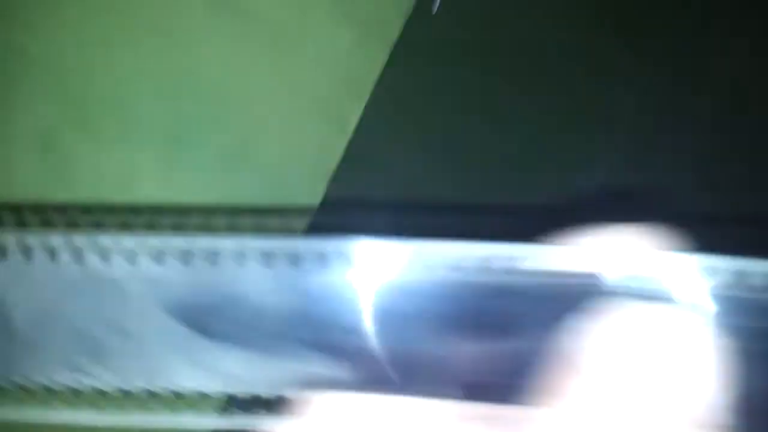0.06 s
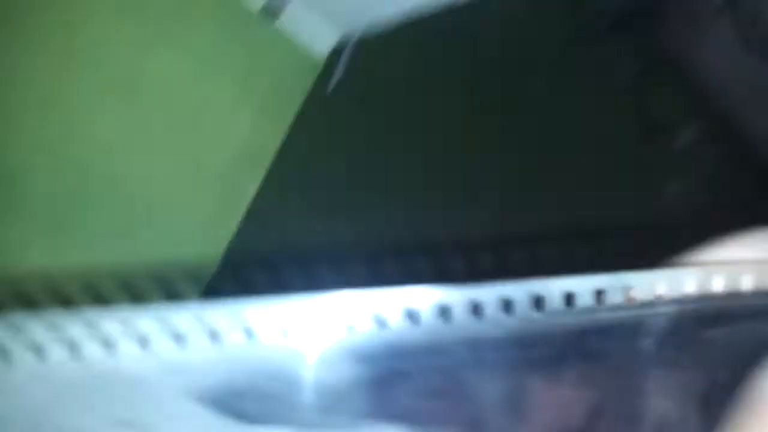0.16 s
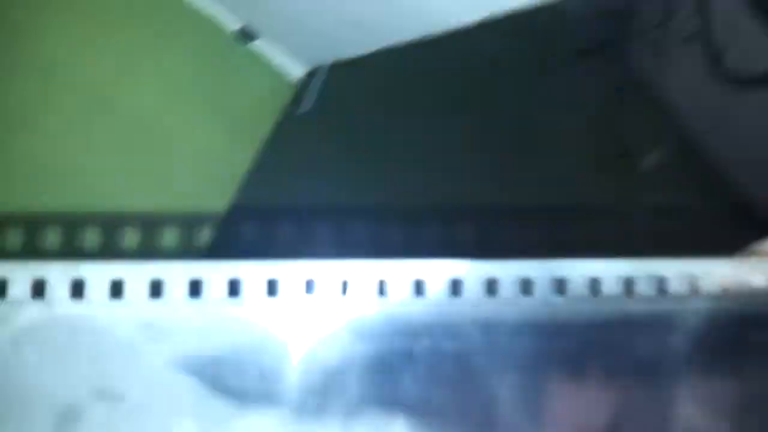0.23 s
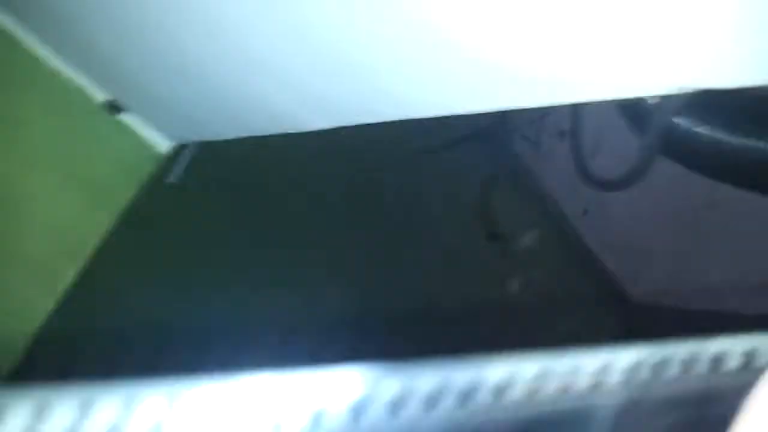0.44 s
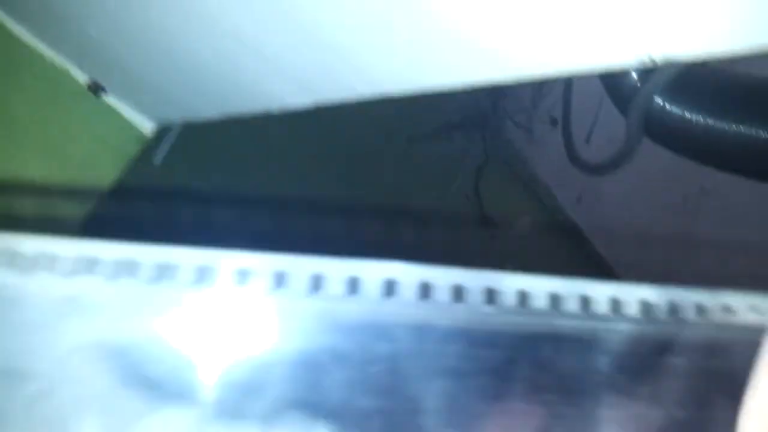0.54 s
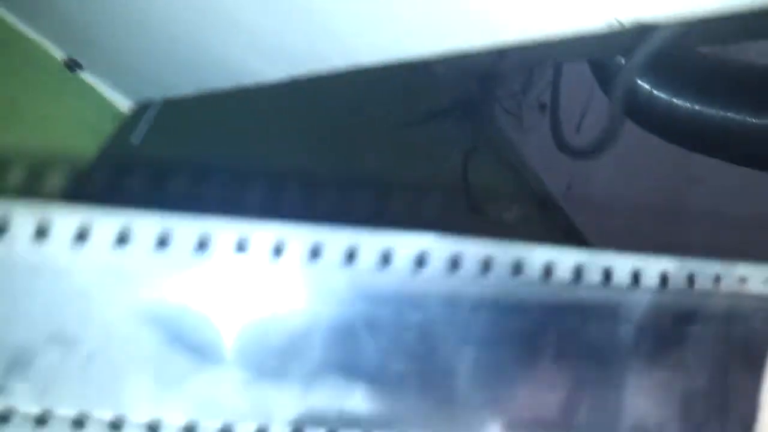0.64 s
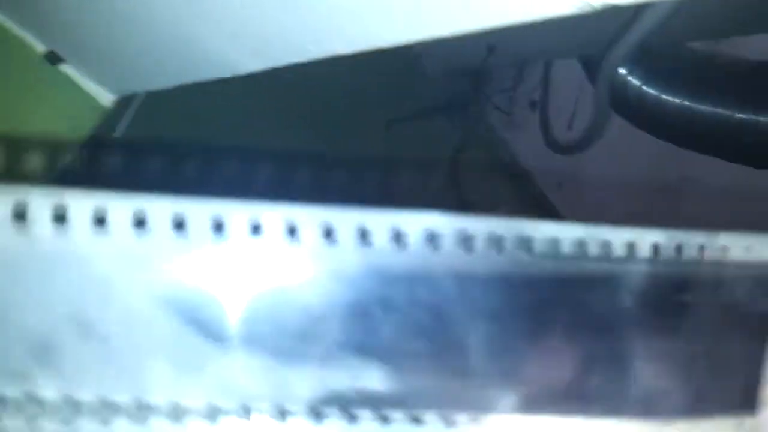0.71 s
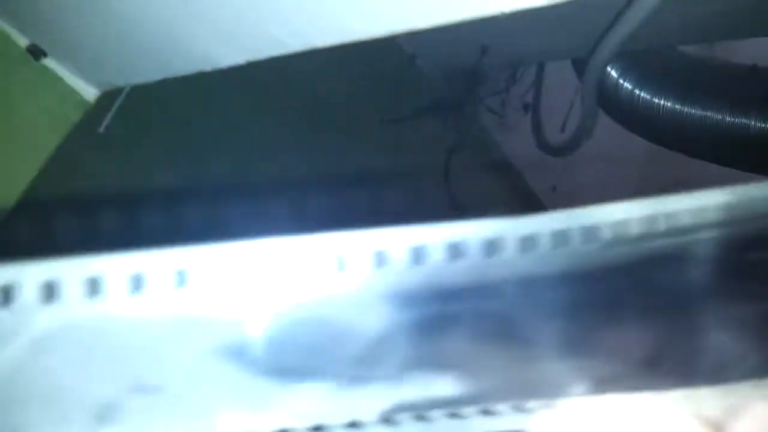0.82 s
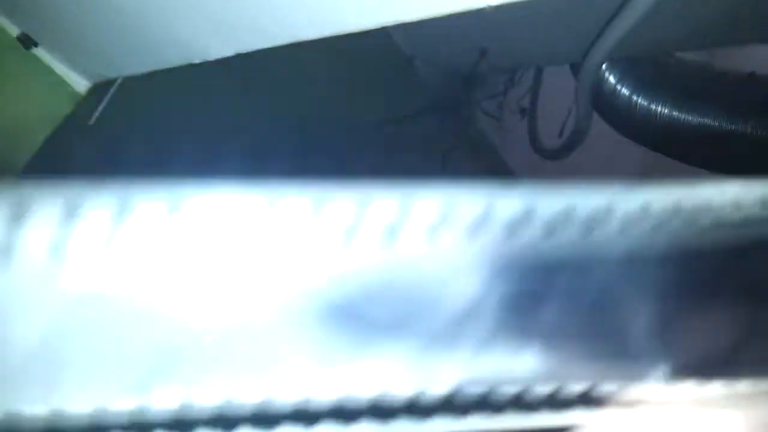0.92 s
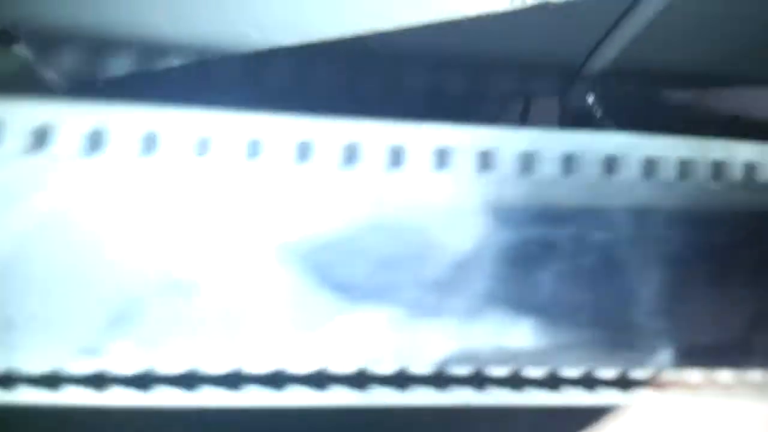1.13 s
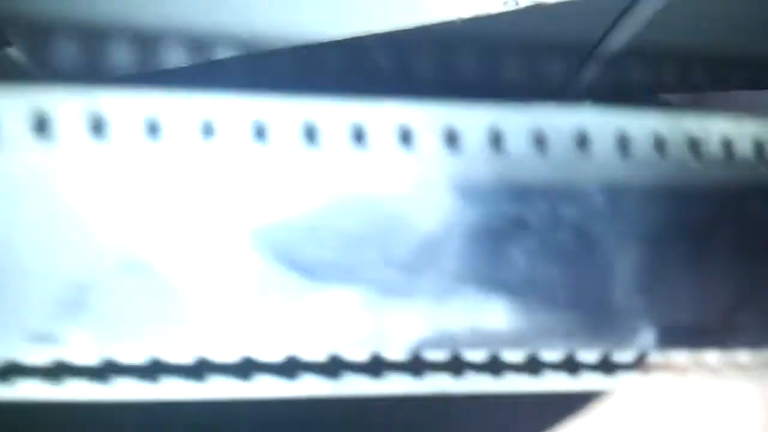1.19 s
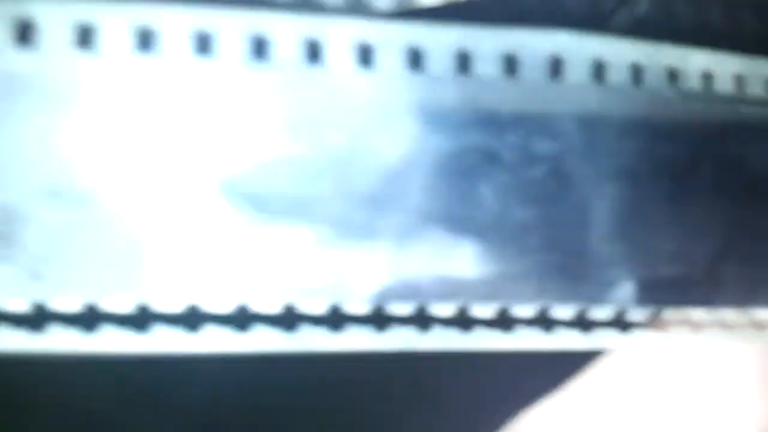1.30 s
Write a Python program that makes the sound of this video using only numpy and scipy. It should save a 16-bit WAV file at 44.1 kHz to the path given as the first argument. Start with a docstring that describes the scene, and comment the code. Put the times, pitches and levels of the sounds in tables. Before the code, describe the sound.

Close to the microphone, stiff film slides hissing between fingers and buckles in quick, irregular clicks, loudest just past the middle. Faint hand shuffling and soft bumps lie underneath, with a short room echo and quiet steady hiss.

```python
"""Film strip through the fingers

Close to a camera's microphone, in a hard-walled room, a strip of photographic film is pulled by hand.
The stiff strip hisses as it slides and buckles with sharp snaps; some snaps jolt the camera.
Behind it the room rings on for about a second over a quiet, steady hiss."""
import sys
import numpy as np
from scipy import signal
from scipy.fft import rfft, irfft, next_fast_len
from scipy.io import wavfile

SR = 44100
rng = np.random.default_rng(int(sys.argv[2]) if len(sys.argv) > 2 else 0)


def to_wav(sig):
    """Store sig (one row per channel, or 1-D mono) as 16-bit WAV at the path in sys.argv[1].

    Samples outside -1..1 are clipped; the rate is SR.
    """
    pcm = np.clip(np.atleast_2d(sig), -1, 1) * 32767
    pcm = np.round(pcm).astype(np.int16)
    wavfile.write(sys.argv[1], SR, pcm.T)  # frames by channels


N = 59535

# Colours of the steady hiss and of the room's lingering wash: (frequency [Hz], relative level [dB])
HISS_COLOUR = [(25, -6.5), (250, -3), (700, -7), (1100, -6), (1700, -16.5), (4200, -11), (5500, -6),
               (9000, -36), (15500, -18)]
WASH_COLOUR = [(100, -26), (400, -10), (900, -8.5), (1800, -2.5), (3000, -1), (5000, 1), (8000, -5.5),
               (15000, -36)]
# Film sliding between the fingers, close up: (time [s], level [dB])
SLIDE_LEVEL = [(0, -55.5), (.105, -48.5), (.165, -42.5), (.21, -45.5), (.25, -37), (.295, -45.5),
               (.35, -51.5), (.395, -42.5), (.478, -44.5), (.492, -54.5), (.555, -49), (.6, -44),
               (.655, -55), (.69, -57), (.71, -43.5), (.735, -52), (.76, -35.5), (.83, -44.5), (.9, -65),
               (.945, -38), (.98, -74), (1.02, -48.5), (1.07, -51.5), (1.11, -62.5), (1.35, -69)]
# Colours of skin rubbing on film and of the fizz above it: (frequency [Hz], relative level [dB])
RUB_COLOUR = [(200, -50), (1000, -24.5), (2500, -22.5), (4000, -14), (5200, -9.5), (6000, 0.5),
              (7000, -1.5), (8500, -7.5), (12000, -14), (15500, -18.5)]
FIZZ_COLOUR = [(3000, -31), (6000, -18), (12300, -9), (15500, -15)]
# Bright swish of the film's edge: (time [s], level [dB], t60 [s])
EDGE_FLICKS = [(.702, -39.5, 0.17)]
# Hands moving near the microphone: (time [s], level [dB])
SHUFFLE_LEVEL = [(0, -65.5), (.22, -57.5), (.4, -62.5), (.66, -66), (.715, -59), (.78, -56), (.9, -61),
                 (.95, -54.5), (1.02, -68), (1.35, -76)]
# Jolts that reach the camera body: (time [s], level [dB])
CAMERA_JOLTS = [(0.119, -53.5), (0.525, -53), (0.766, -50)]
# Colours of the shuffle and of a jolt's thud: (frequency [Hz], relative level [dB])
SHUFFLE_COLOUR = [(40, -6.5), (150, -4.5), (300, 4), (750, -2), (1300, -7), (3000, -16)]
THUD_COLOUR = [(10, 11), (30, -15), (70, -3.5), (150, -24), (500, -41)]
# The strip buckles, mostly in quick bright snaps, once in a slow low flex: (time [s], ring level [dB],
# ring pitch [Hz], swell to peak [s], crack level [dB], crack tilt [dB/octave], flap level [dB])
BUCKLES = [(0.117, -20, 7430, 0.00034, -39, 4, -43), (0.1194, -19, 6030, 0.00061, -26.5, 0, -41),
           (0.1221, -25.5, 5540, 0.00066, -29, 3, -35), (0.1794, -33, 2800, 0.00047, -36, -6, -41),
           (0.1818, -22, 2980, .0008, -47, -6, -35), (0.1847, -35.5, 1300, 0.0004, -52, -4, -34),
           (0.2281, -31.5, 5600, 0.00096, -32, -1, -39), (0.5256, -20, 6970, 0.00033, -24.5, 2.5, -46.5),
           (0.544, -32, 5700, 0.00023, -32.5, 0.5, -50), (.6238, -41, 4020, 0.00034, -43, -1, -64),
           (0.6319, -40, 5670, 0.00036, -56, -3, -45), (0.6896, -29.5, 13800, 0.00033, -31.5, 3, -43),
           (.7480, -44.5, 740, 0.0041, -40, -11, -41), (0.7495, -22, 8640, 0.00022, -23, 3, -47),
           (0.7511, -19.5, 5590, 0.00087, -20, -20, -34.5), (0.766, -11.5, 6830, 0.00032, -22.5, 3, -26.5),
           (.8108, -18.5, 7120, 0.00051, -21.5, 0.5, -50), (.8546, -22.5, 6550, 0.00026, -24.5, -3, -62),
           (.8615, -25, 3640, 0.00038, -40, -9, -32.5), (0.87, -25, 7530, 0.0003, -34, 7, -60),
           (0.9324, -29, 6500, 0.00039, -32.5, -13.5, -41.5),
           (0.9524, -32.5, 6170, 0.0013, -29.5, -0.5, -39), (.96, -33, 5830, 0.00034, -31.5, -3.5, -50),
           (1.155, -35, 6760, 0.00043, -53, -3, -61), (1.1586, -29.5, 5920, 0.00044, -41.5, -1, -49)]
# Bending modes of the curled strip: (frequency [Hz], level relative to the flap [dB], t60 [s])
BENDING_MODES = [(720, -21, 0.016), (931, -21.5, 0.045), (1150, -19, 0.029), (1450, -16.5, 0.016)]
# Colours of a snap's bright crack and dull flap: (frequency [Hz], relative level [dB])
CRACK_COLOUR = [(1000, -38), (3000, -19), (4200, 4.5), (7000, 7), (12000, 2), (15500, -12.5)]
FLAP_COLOUR = [(60, -4), (250, -20), (700, -5.5), (1500, -2.5), (3000, 4.5), (5000, 3.5), (9000, -18)]
# Decay between the hard walls: (frequency [Hz], t60 [s])
ROOM_DECAY = [(200, 1.6), (1000, 0.82), (4000, 0.55), (5800, 0.67), (15000, 0.58)]
# Tone of the room's tail at the microphone: (frequency [Hz], gain [dB])
ROOM_COLOUR = [(200, -2.5), (1000, 5), (4200, 0.5), (6000, 1), (9000, -4), (15000, -7)]

SNAP_S = 0.08  # time allowed for one snap to die away


def amp(db):
    """Decibels to gain."""
    return 10 ** (np.asarray(db) / 20)


def unit(x):
    """Scale to rms 1."""
    return x / np.sqrt(np.mean(x ** 2) + 1e-20)


def along(points, hz):
    """(Hz, value) points read on a log axis."""
    f, v = np.transpose(points)
    return np.interp(np.log(hz + 1), np.log(f + 1), v)


def level(rows):
    """(s, dB) points as a gain per sample."""
    return amp(np.interp(np.arange(N) / SR, *np.transpose(rows)))


def filtered(x, response):
    """x through a gain that depends on frequency."""
    n = x.shape[-1]
    padded = next_fast_len(n + n // 5)
    return irfft(rfft(x, padded) * response(np.fft.rfftfreq(padded, 1 / SR)), padded)[..., :n]


def coloured(x, spectrum):
    """x with a (Hz, dB) colour, at rms 1."""
    return unit(filtered(x, lambda hz: amp(along(spectrum, hz))))


def noise(spectrum):
    """Steady noise of a given colour."""
    return coloured(rng.standard_normal(N), spectrum)


def burst(source, s, t60, rise):
    """A quickly rising, dying piece of a noise, starting at s; its envelope sets its energy."""
    t = np.maximum(np.arange(len(source)) / SR - s, 0)
    shape = amp(-60 * t / t60) * (1 - np.exp(-t / rise))
    return unit(source * shape) * np.sqrt(np.mean(shape ** 2))


def even_burst(s, t60, rise):
    """A short white burst with its spectrum evened out, so that no pitch stands out."""
    t = np.arange(int(SNAP_S * SR)) / SR - s
    x = burst(rng.standard_normal(len(t)), s, t60, rise)
    size = x.std()
    for _ in range(4):
        flat_spectrum = np.exp(1j * np.angle(rfft(x)))
        x = irfft(flat_spectrum, len(t)) * (t > 0) * (t < t60)
    return size * unit(x)


def add(track, s, sound):
    """Mix a short sound into a track at time s."""
    part = track[round(s * SR):][:len(sound)]
    part += sound[:len(part)]


def background(hiss_db=-63.5, wash_db=-47, fall_db_per_s=30):
    """Steady hiss under the fading wash of a room that is still ringing at the start."""
    wash_gain = amp(wash_db - fall_db_per_s * np.arange(N) / SR)
    return amp(hiss_db) * noise(HISS_COLOUR) + wash_gain * noise(WASH_COLOUR)


def slide(slips_per_s=8300, spread_db=1, fizz_peak_db=-48):
    """Tiny slips of skin on film sound through the strip's resonance; speed or a flick adds fizz."""
    slips = (rng.random(N) < slips_per_s / SR) * rng.standard_normal(N)
    slips *= amp(-spread_db * rng.standard_normal(N))
    speed = level(SLIDE_LEVEL)
    fizz = noise(FIZZ_COLOUR)
    fizz_gain = amp(fizz_peak_db) * (speed / speed.max()) ** 1.34  # grows faster than the rub
    flicks = sum(amp(db) * burst(fizz, s, t60, rise=0.011) for s, db, t60 in EDGE_FLICKS)
    return speed * coloured(slips, RUB_COLOUR) + fizz_gain * fizz + flicks


def hands():
    """The hands shuffle softly by the microphone and pass low jolts into the camera body."""
    thud = noise(THUD_COLOUR)
    jolts = sum(amp(db) * burst(thud, s, t60=0.25, rise=0.0035) for s, db in CAMERA_JOLTS)
    return level(SHUFFLE_LEVEL) * noise(SHUFFLE_COLOUR) + jolts


def snaps(curl_spread=0.058):
    """Each buckle briefly rings the strip, with a crack and a dull flap that stirs its bending modes."""
    rings, knocks = np.zeros(N), np.zeros(N)
    t = np.arange(int(SNAP_S * SR)) / SR
    for s, ring_db, ring_hz, swell_s, crack_db, tilt, flap_db in BUCKLES:
        swell = (t / swell_s * np.exp(1 - t / swell_s)) ** 2
        add(rings, s, amp(ring_db) * swell * np.sin(2 * np.pi * ring_hz * t))
        detune = np.exp(curl_spread * rng.standard_normal())  # the curl changes from snap to snap
        bends = sum(amp(db + rng.normal(0, 1) - 60 * t / t60) * np.sin(2 * np.pi * hz * detune * t)
                    for hz, db, t60 in BENDING_MODES)
        crack = even_burst(0, t60=0.0076, rise=0.0001)
        flap = even_burst(0, t60=0.015, rise=0.000276)
        tilted = [(hz, db + tilt * np.log2(hz)) for hz, db in CRACK_COLOUR]
        add(knocks, s, amp(crack_db) * crack.std() * coloured(crack, tilted))
        add(knocks, s, amp(flap_db) * (flap.std() * coloured(flap, FLAP_COLOUR) + bends))
    return rings, knocks


def early_echoes(x, gap_s=0.0015):
    """Hands and close surfaces scatter each snap back to the microphone, by new paths every time."""
    scattered = np.zeros(N)
    cuts = sorted(row[0] for row in BUCKLES) + [N / SR]
    for start, end in zip(cuts, cuts[1:]):
        snap = x[round(start * SR):round(end * SR)]
        echoes = even_burst(gap_s, t60=0.022, rise=0.00041)
        add(scattered, start, signal.fftconvolve(snap, echoes / np.linalg.norm(echoes)))
    return scattered


def room(x):
    """Farther off, the hard walls return a diffuse tail whose treble dies first."""
    hz, t, bands = signal.stft(rng.standard_normal(SR), SR, nperseg=256)
    decay = amp(-60 * t / along(ROOM_DECAY, hz)[:, None])
    tail = signal.istft(bands * decay, SR, nperseg=256)[1]
    wet = signal.fftconvolve(x, tail / np.linalg.norm(tail))[:N]
    return filtered(wet, lambda f: amp(along(ROOM_COLOUR, f)))


def scene(snap_send_db=-2, rub_send_db=-23, early_db=-7.5):
    """Film and hands close to the microphone, the room behind, the same in both channels."""
    rings, knocks = snaps()
    rub = slide()
    clicks = rings + knocks
    radiated = knocks + amp(-7.5) * rings  # the rings reach the room less than the cracks
    tail = room(amp(snap_send_db) * radiated + amp(rub_send_db) * rub)
    mono = clicks + amp(early_db) * early_echoes(clicks) + rub + tail + hands() + background()
    return np.array([mono, mono])


def record(dry, top_hz=15600):
    """The camera cuts off steeply above its band limit."""
    return filtered(dry, lambda hz: 1 / np.sqrt(1 + (hz / top_hz) ** 200))


dry = scene()
out = record(dry)
to_wav(out)
```